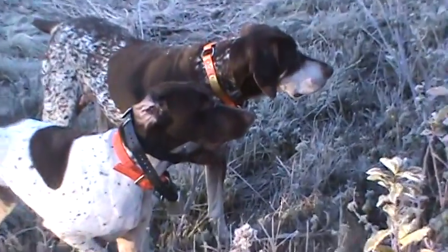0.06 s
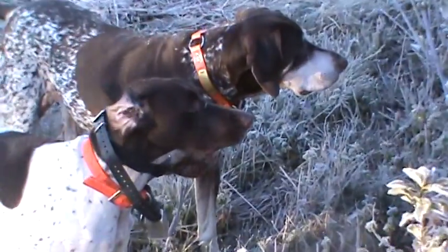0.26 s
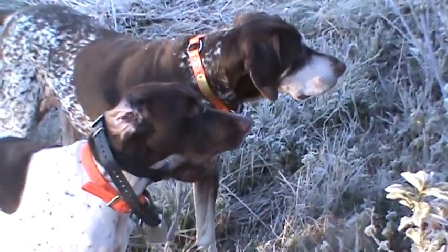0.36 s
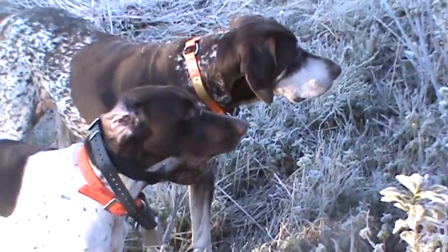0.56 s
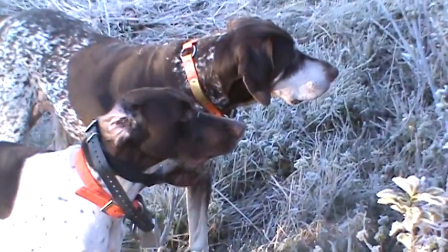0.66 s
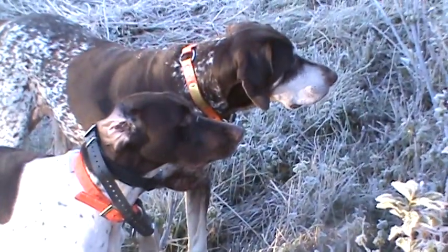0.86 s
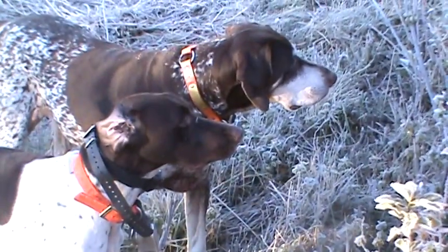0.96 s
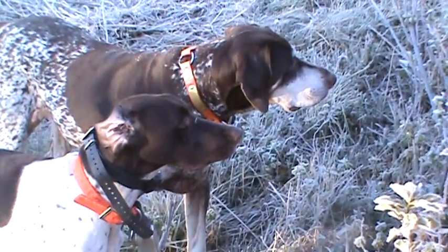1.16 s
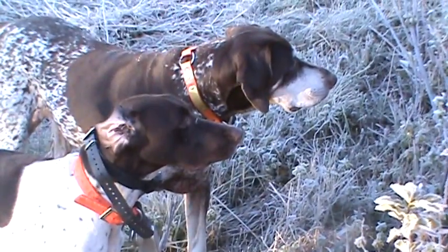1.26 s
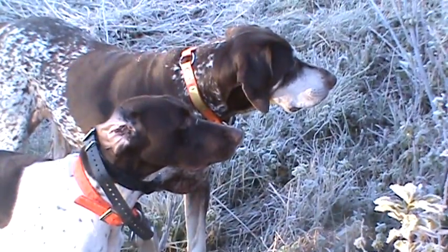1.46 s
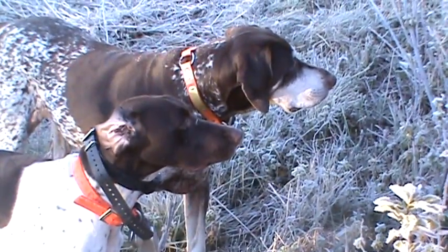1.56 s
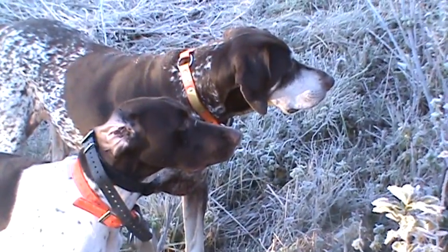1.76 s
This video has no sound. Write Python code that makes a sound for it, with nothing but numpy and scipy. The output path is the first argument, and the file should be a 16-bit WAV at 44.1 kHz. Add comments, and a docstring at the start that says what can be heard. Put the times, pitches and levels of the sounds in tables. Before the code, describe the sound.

One sharp plastic click comes at about 0.25 seconds, close to the microphone, as a camera's zoom lever snaps back. A faint motor whir from the start ends with tiny ticks by 0.4 seconds. Grass rustles very softly near 0.6, 0.8 and 1.2 seconds, and a dog whines barely audibly around 0.9. Quiet outdoor rumble, hiss and the camera's faint hum and ticking run throughout.

```python
"""A still, frosty field, heard on a camcorder's own stereo microphone. Low rumble, hiss and a slow swell
of far-off noise lie under the close hum and ticking of the tape drive. The zoom motor whirs at first;
at 0.24 s the released lever snaps back, one sharp click through the plastic case, and the lens stops
with a few tiny ticks. Then the grass rustles softly, a dog gives one very faint whine at 0.8 s,
and the grass stirs once more."""
import sys
import numpy as np
from scipy import signal
from scipy.fft import rfft, irfft, next_fast_len
from scipy.io import wavfile
from scipy.ndimage import uniform_filter1d, map_coordinates

SR = 44100
rng = np.random.default_rng(int(sys.argv[2]) if len(sys.argv) > 2 else 0)


def wav_record(signal):
    """Record a signal, one row per channel, as 16-bit PCM in the file named by sys.argv[1]."""
    frames = np.transpose(np.atleast_2d(signal))
    bounded = np.clip(frames, -1, 1)
    # unit amplitude maps onto the largest positive 16-bit level
    quanta = np.round(bounded * 32767).astype(np.int16)
    wavfile.write(sys.argv[1], SR, quanta)


N = 79380
PORTS = np.array([[.5], [-.5]])  # each microphone port's share of a left-minus-right difference


def amp(db):
    return 10 ** (np.asarray(db) / 20)


def unit(x):
    return x / np.sqrt(np.mean(x ** 2) + 1e-20)


def along(points, hz):
    """A curve through (f/Hz, value) points on a log frequency axis."""
    f, v = np.transpose(points)
    return np.interp(np.log(hz + 1), np.log(f + 1), v)


def clock():
    return np.arange(N) / SR


def wobble(rate):
    """A smooth random curve, rate knots a second."""
    return map_coordinates(rng.standard_normal(int(N * rate / SR) + 4), [clock() * rate])


def filtered(x, response):
    """x shaped by a gain that depends on frequency."""
    size = next_fast_len(N + SR // 2)
    return irfft(rfft(x, size) * response(np.fft.rfftfreq(size, 1 / SR)), size)[..., :N]


def low_cut(x, hz):
    return signal.sosfilt(signal.butter(4, hz, "high", fs=SR, output="sos"), x)


def noise(spectrum, alike, patchy_db=0):
    """Stereo noise of rms 1 with patches of random gain; alike lists (f/Hz, left-right correlation)."""
    cells = signal.stft(rng.standard_normal((2, N)), nperseg=512)[2]
    patches = uniform_filter1d(rng.standard_normal(cells.shape[1:]), size=8, axis=0)
    patches = uniform_filter1d(patches, size=12, axis=1)
    pair = signal.istft(cells * amp(patchy_db * unit(patches)), nperseg=512)[1][:, :N]
    angle = lambda hz: np.arccos(np.clip(along(alike, hz), -1, 1)) / 2
    response = lambda hz: amp(along(spectrum, hz)) * [np.cos(angle(hz)), np.sin(angle(hz))]
    mid, side = filtered(pair, response)
    return unit(np.array([mid + side, mid - side]))


def struck(t, t60, rise_s=.0005):
    """Quick rise and exponential decay from t = 0."""
    t = np.maximum(t, 0)
    return (1 - np.exp(-t / rise_s)) * amp(-60 * t / t60)


def tone(hz, spread):
    """A stereo sine of rms 1 on a pitch curve; left leads and right lags by spread radians."""
    phase = 2 * np.pi * (np.cumsum(hz) / SR + rng.random())
    return np.sqrt(2) * np.sin(phase + 2 * spread * PORTS)


def open_field():
    """Uneven low rumble and one slow, far-off swell under the hiss of open air and microphone."""
    # spectra of the rumble, the distant noise and the hiss: f/Hz, relative level/dB
    rumble_spectrum = [(15, -20), (30, -15), (50, 0), (68, 4.5), (100, -2.5), (140, -11.5), (300, -30.5)]
    far_spectrum = [(120, -16), (280, -0.5), (390, -1.5), (520, -1.5), (1000, -3), (2000, -21)]
    air_spectrum = [(40, -0.5), (150, -0.5), (290, 4), (390, -2), (510, 4), (720, -1.5), (1300, 0),
                    (1500, -6), (2500, -6), (4000, -11), (5100, -12), (7000, -14.5), (15500, -17.5)]
    # how alike the field sounds at the two ports: f/Hz, correlation
    alike = [(60, 0.99), (120, 0.75), (240, 0.8), (480, 0.58), (950, -0.074), (1890, -0.58), (3770, -0.26),
             (7520, 0.18), (15000, 0.86)]
    rumble = unit(amp(2.5 * wobble(22.05)) * noise(rumble_spectrum, [(60, .998)]))
    swell = np.exp(-((clock() - 0.7) / 0.69) ** 2)
    far = swell * noise(far_spectrum, alike, patchy_db=1.5)
    air = noise(air_spectrum, alike, patchy_db=1)
    return amp(-65) * rumble + amp(-63.5) * far + amp(-58) * air


def tape_drive():
    """The tape drive, right by the microphone: a wavering hum and thin, steady tones."""
    # tones of the running drive: f/Hz, level/dB
    partials = [(307, -77), (490, -75.5), (770, -80.5), (840, -75), (910, -71.5), (1190, -73.5),
                (1260, -72), (1330, -78), (1610, -93), (1685, -80.5), (2525, -81), (5050, -78.5),
                (10099, -93)]
    tones = sum(amp(db) * tone(hz + 1.4 * wobble(20), spread=0.61) for hz, db in partials)
    hum_db = -66.5 + 2.3 * wobble(12.6)
    hum_hz = 102.7 + 4.85 * wobble(17)
    return tones + amp(hum_db) * tone(hum_hz, spread=0)


def zoom_motor():
    """Gear noise and fluttering motor whine, which stop just after the lever is let go."""
    # spectrum of the gears: f/Hz, relative level/dB
    gear_spectrum = [(2500, -27), (4200, -11), (5300, -4), (6000, -13), (7200, -15.5), (9200, -15),
                     (15000, -20)]
    # tones of the motor: f/Hz, level/dB
    partials = [(5394, -82), (6570, -70), (9135, -88), (13464, -76)]
    gears_fade_from_s, stop_s, whine_fade_s, flutter_hz = 0.27, 0.36, 0.022, 60
    t = clock()
    gear_level = amp(-64) * np.interp(t, [gears_fade_from_s, stop_s], [1, 0])
    gears = gear_level * noise(gear_spectrum, [(5000, .4)])
    whine = sum(amp(db) * tone(hz + flutter_hz * wobble(300), spread=0.7) for hz, db in partials)
    return gears + whine * np.clip((stop_s - t) / whine_fade_s, 0, 1)


def tape_ticks():
    """The running tape mechanism ticks faintly, fifteen times a second."""
    # spectrum of a tick: f/Hz, relative level/dB
    spectrum = [(1500, -22), (3800, -8), (5050, 0), (6200, -23), (14000, -17)]
    first_s, period_s = .0555, .06673
    since_tick = (clock() - first_s) % period_s
    return amp(-58) * struck(since_tick, t60=0.023) * noise(spectrum, [(5000, .5)])


def zoom_lever():
    """The lever scrapes back, snaps home and rings the plastic case that holds the microphone."""
    # modes of the case: f/Hz, relative level/dB, t60/s, left minus right/dB, lag of the left port/ms
    modes = [(696, -36.1, 0.02, 3, 0.13), (896, -37.5, 0.08, -0.4, -0.14), (1030, -30.5, 0.033, -9, -0.015),
             (1110, -14.5, 0.025, -1.5, 0.027), (1348, -18.5, 0.023, 9, 0.045),
             (1620, -12, 0.025, -2.5, 0.35), (1915, -17, 0.016, -8, 0.013), (2220, -10.5, 0.0154, -4, 0.27),
             (2390, -35, 0.068, -4, 0.235), (2885, -20, 0.012, 6, 0.083), (3090, -27.5, 0.017, -9, 0.016),
             (3818, -19.5, 0.0066, -4, -0.02), (4770, -22, 0.0084, 3, 0.028),
             (6360, -22, 0.0086, -9.5, 0.028), (7610, -24.5, 0.0063, -3.2, 0.028),
             (9340, -16.5, 0.0033, -7, 0.012), (11430, -21, 0.0027, -5, -0.0013)]
    # light scrapes of the sliding lever: t/s, level/dB
    contacts = [(0.2335, -34.5), (0.2351, -33.5), (0.2379, -28.5), (0.2396, -24)]
    # spectra of the scrapes and of the case's after-ring: f/Hz, relative level/dB
    scrape_spectrum = [(500, -6), (1500, -6), (3000, 2), (6500, -7), (9300, -3), (12000, -10), (15500, -18)]
    ring_spectrum = [(200, -41), (500, -23), (720, -5.5), (1050, -5.5), (2800, -11), (4500, -24),
                     (14000, -46)]
    snap_s, modes_gain_db, thump_hz = .2393, 0.64, 72.4
    t = clock() - snap_s
    click = np.zeros((2, N))
    for hz, db, t60, pan_db, lag_ms in modes:
        port_t = t - PORTS * lag_ms / 1000
        level = amp(modes_gain_db + db + PORTS * pan_db)
        click += level * struck(port_t, t60) * np.sin(2 * np.pi * hz * port_t)
    scrape_level = sum(amp(db) * struck(clock() - s, t60=0.0072) for s, db in contacts)
    scrapes = scrape_level * noise(scrape_spectrum, [(1000, 0.97)])
    stir = amp(-30) * np.exp(-abs(t) / 0.0017)  # the case stirs just before and after the snap
    after_ring = amp(-47) * struck(t, t60=.17)
    case_noise = (stir + after_ring) * noise(ring_spectrum, [(1000, .2)])
    thump = amp(-52) * struck(t, t60=0.27) * np.sin(2 * np.pi * thump_hz * t)  # the body gives a little
    return low_cut(click + scrapes + case_noise, hz=620) + thump


def lens_ticks():
    """Tiny ticks and pings as the lens comes to rest."""
    # contacts in the settling lens mechanism: t/s, level/dB, f/Hz, half-width/octaves
    contacts = [(0.325, -58.5, 2760, 0.44), (.3395, -54, 5200, 0.96), (.358, -62, 5900, .04),
                (0.362, -55.5, 3030, 0.07)]
    ticks = np.zeros((2, N))
    for s, db, hz, octaves in contacts:
        band = lambda f: 1 / (1 + (np.log2((f + 1) / hz) / octaves) ** 2)
        ping = unit(filtered(rng.standard_normal(N), band))
        ticks += amp(db) * struck(clock() - s, t60=0.028) * ping
    return ticks


def grass():
    """Brief swells of dry rustle in the frosty grass."""
    # the rustles: t/s, level/dB, half-length/s
    rustles = [(0.562, -66.5, 0.086), (0.832, -65.5, 0.056), (1.185, -69, 0.033)]
    # spectrum of the grass: f/Hz, relative level/dB
    spectrum = [(800, -18), (2100, 3.5), (2900, -16), (3800, -6), (5500, -19), (12000, -28)]
    level = sum(amp(db) * np.exp(-((clock() - s) / half) ** 2) for s, db, half in rustles)
    return low_cut(level * noise(spectrum, [(3000, .2)], patchy_db=3.5), hz=700)


def dog():
    """A thin whine that rises quickly and sags; only its overtones are heard."""
    # course of the whine's fundamental pitch and loudness: t/s, f/Hz, level/dB
    contour = [(.815, 874, -90), (.84, 1003, -67), (0.871, 985, -73), (.897, 945, -65.5), (.935, 890, -73),
               (.96, 860, -85)]
    # overtones of the voice: multiple of the pitch, relative level/dB
    harmonics = [(2, -12), (3, -3), (4, -1)]
    t = clock()
    times, hz, db = np.transpose(contour)
    pitch = np.interp(t, times, hz) * (1 + 0.0048 * wobble(150))
    level = amp(np.interp(t, times, db)) * (t > times[0]) * (t < times[-1])
    return level * sum(amp(gain_db) * tone(round(k) * pitch, spread=0.33) for k, gain_db in harmonics)


def scene():
    """The close click over the camera's own noises and the quiet field."""
    balance_db = -0.54  # left minus right
    quiet = open_field() + tape_drive() + zoom_motor() + tape_ticks() + lens_ticks() + grass() + dog()
    return zoom_lever() + quiet * amp(balance_db * PORTS)


def record(dry):
    """The camcorder keeps nothing above its band limit."""
    top_hz = 15850
    return filtered(dry, lambda hz: hz < top_hz)


dry = scene()
out = record(dry)
wav_record(out)
```